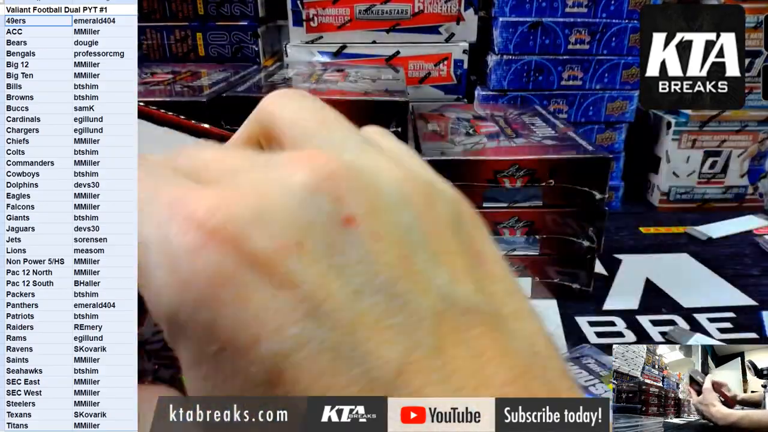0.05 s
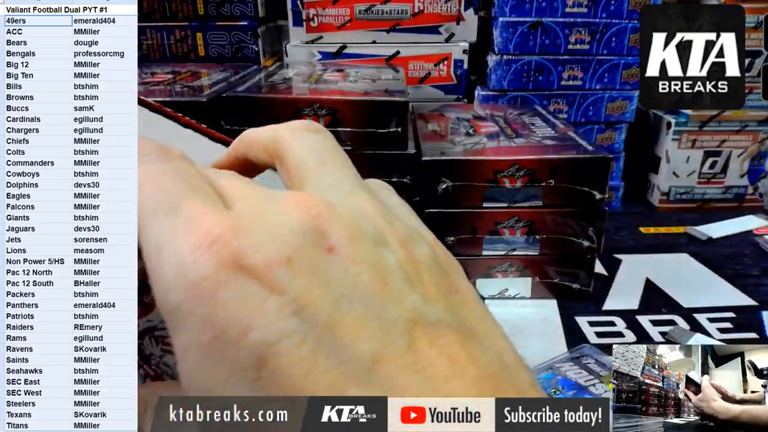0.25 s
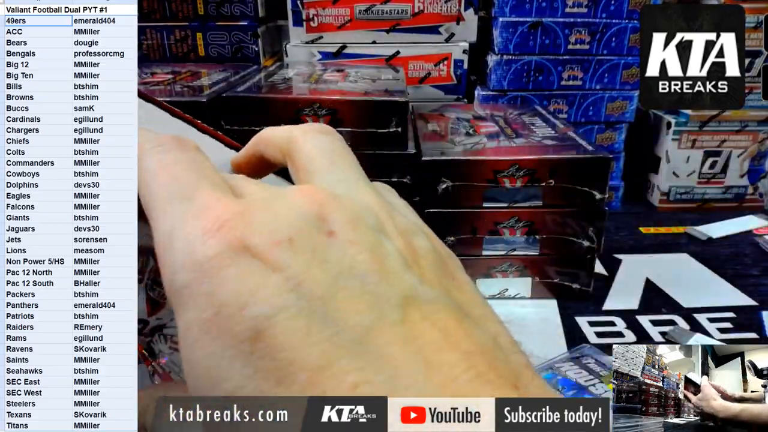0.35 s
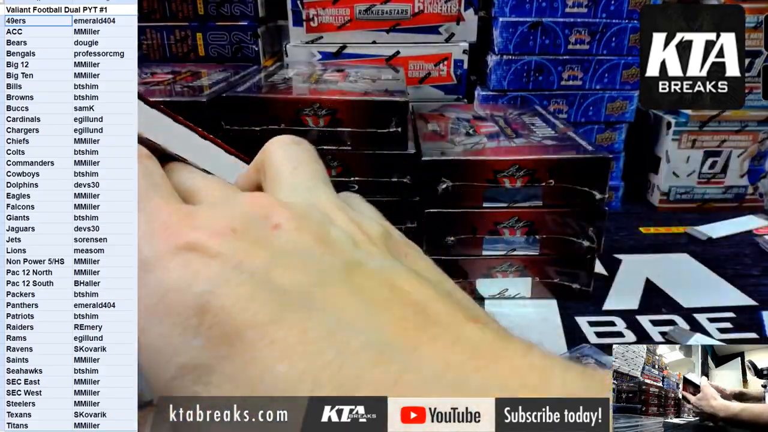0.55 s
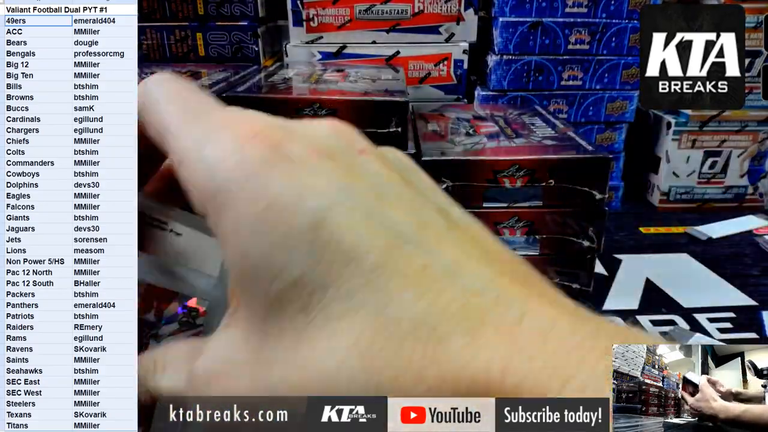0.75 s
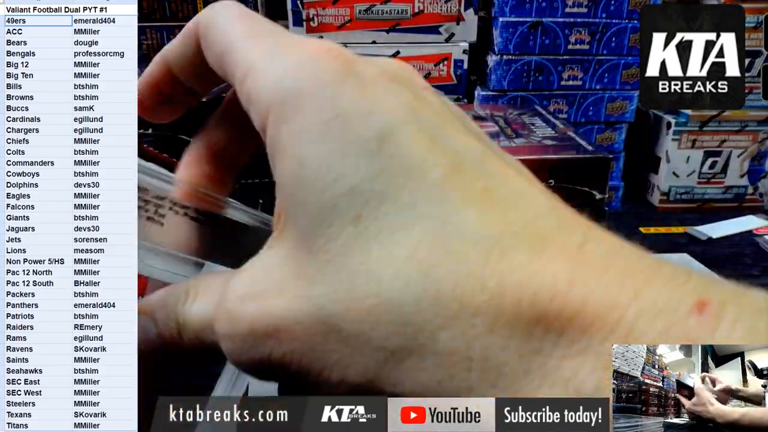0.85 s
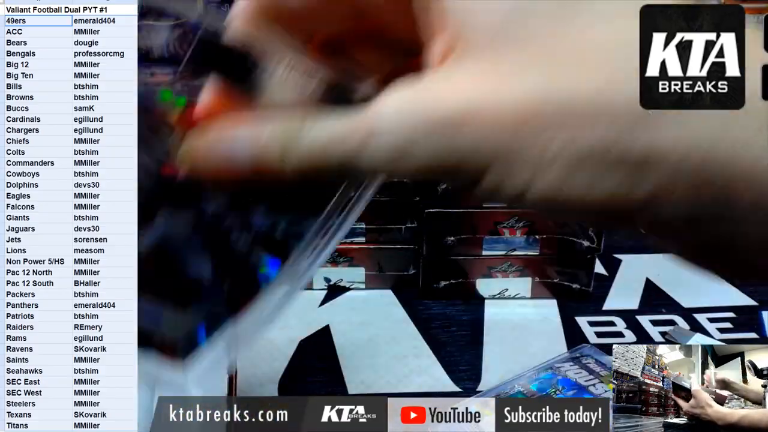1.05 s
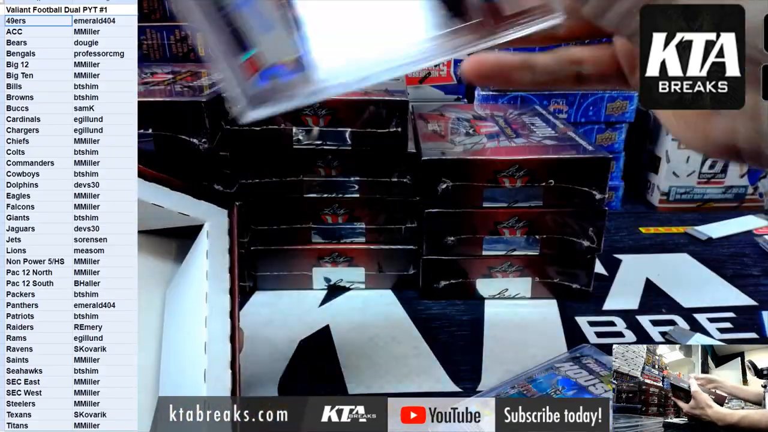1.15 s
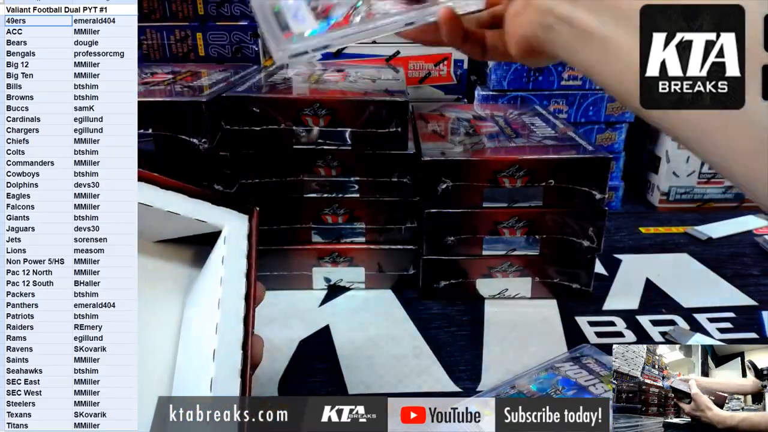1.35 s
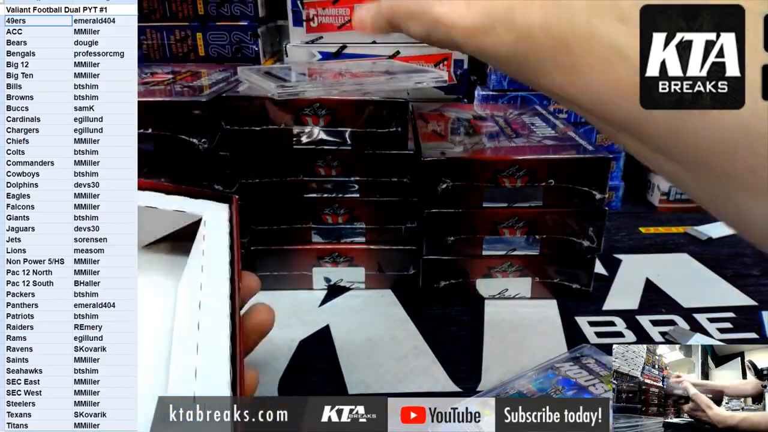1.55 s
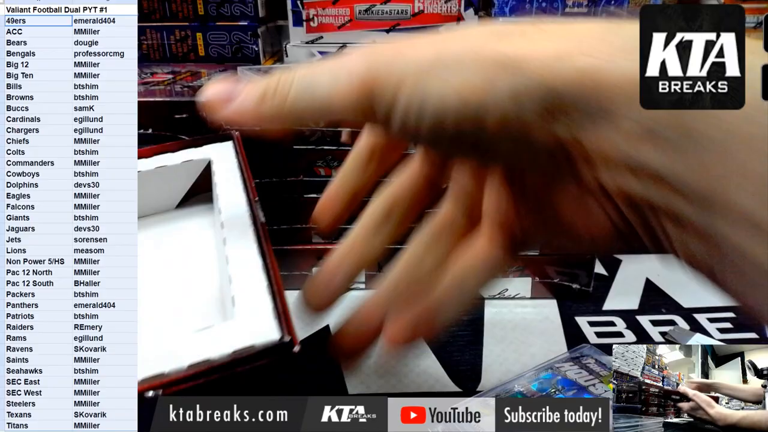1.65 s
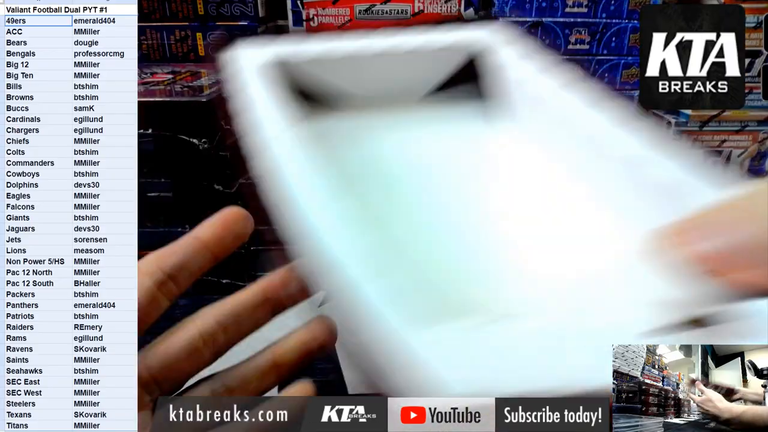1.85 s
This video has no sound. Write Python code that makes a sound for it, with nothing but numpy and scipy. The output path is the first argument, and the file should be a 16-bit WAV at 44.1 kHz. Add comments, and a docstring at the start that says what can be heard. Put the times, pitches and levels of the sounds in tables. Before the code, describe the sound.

Cardboard box bumps down with a deep boom, followed by taps, rubbing and a sharp plastic clack.

```python
"""Soft room noise and a faint slide come first, then a cardboard box of trading cards bumps down.
The table booms as a low mode and leaves the room's bass ringing; box and plastic case ring in damped modes.
Fingers tap the cardboard in short noise clicks and scrape it in strokes of jerky friction noise.
A plastic card case slides out, knocks on a stack of boxes and is pushed into place.
All is heard close to a microphone in a small room, with early echoes and a short reverb tail."""
import sys
import numpy as np
from scipy import signal
from scipy.fft import rfft, irfft, next_fast_len
from scipy.io import wavfile
from scipy.ndimage import map_coordinates

SR = 44100
rng = np.random.default_rng(int(sys.argv[2]) if len(sys.argv) > 2 else 0)


def int16_out(signal):
    """Quantize to a 16-bit WAV file."""
    q = np.round(np.clip(np.atleast_2d(signal).T, -1, 1) * 32767)
    wavfile.write(sys.argv[1], SR, q.astype(np.int16))


N = 83790  # length in samples


def amp(db):
    """Decibels to gain."""
    return 10 ** (np.asarray(db) / 20)


def unit(x):
    """Scale to rms 1."""
    return x / np.sqrt(np.mean(x ** 2) + 1e-20)


def along(points, hz):
    """Read (f/Hz, value) points on a log frequency axis."""
    f, v = np.transpose(points)
    return np.interp(np.log(hz + 1), np.log(f + 1), v)


def since(s):
    """Seconds since s, zero before it."""
    return np.maximum(np.arange(N) / SR - s, 0)


def filtered(x, response):
    """x times a response of frequency, padded so that its ringing does not wrap round."""
    m = next_fast_len(N + SR // 2)
    return irfft(rfft(x, m) * response(np.fft.rfftfreq(m, 1 / SR)), m)[:N]


def coloured(x, spectrum):
    """x shaped by a spectrum, at rms 1."""
    return unit(filtered(x, lambda hz: amp(along(spectrum, hz))))


def noise(spectrum):
    """Coloured noise of rms 1."""
    return coloured(rng.standard_normal(N), spectrum)


def wobble(rate):
    """A smooth random curve, rate knots a second."""
    knots = rng.standard_normal(2000)
    return map_coordinates(knots, [np.arange(N) * rate / SR], mode="wrap")


def resonance(x, centre_hz, q):
    """x through one band-pass resonance with unity gain at its centre."""
    def response(f):
        damping = 1j * f * centre_hz / q
        return damping / (centre_hz ** 2 - f * f + damping)
    return filtered(x, response)


def ring(s, db, modes, attack_s, rough):
    """Damped modes struck at s, their phases wandering by rough radians per unit of wobble."""
    t = since(s)
    partials = np.zeros(N)
    for hz, level, t60 in modes:
        phase = 2 * np.pi * hz * t + rough * wobble(hz / 8)
        partials += amp(level - 60 * t / t60) * np.sin(phase)
    return amp(db) * partials * (1 - np.exp(-t / attack_s))


# colour of the room noise: f/Hz, relative level/dB
FLOOR_COLOUR = [(20, -6.5), (40, 1.5), (72, -4.5), (100, -3.5), (170, -8.5), (240, -5), (320, -18.5),
                (650, -15.5), (1000, -26), (2000, -33.5), (4000, -43.5), (9000, -46.5), (16000, -49.5)]


def room_noise():
    """Steady coloured noise underneath everything."""
    return amp(-44.5) * noise(FLOOR_COLOUR)


# decay of the room's tail: f/Hz, t60/s
ROOM_DECAY = [(100, 0.26), (1000, 0.21), (5000, 0.17), (15000, 0.11)]


def room_tail(x):
    """The short answer of a furnished room: decaying noise whose treble dies sooner than its bass."""
    hz, t, grains = signal.stft(rng.standard_normal(SR // 2), SR, nperseg=256)
    fade = amp(-60 * t / along(ROOM_DECAY, hz)[:, None])
    tail = signal.istft(grains * fade, SR, nperseg=256)[1]
    late = np.pad(x, (200, 0))  # pre-delay in samples
    wet = signal.fftconvolve(late, tail / np.linalg.norm(tail))
    return amp(-11.5) * wet[:N]


def nearby(x):
    """Weak early echoes from the table top and the stacked boxes comb the sound."""
    delays = rng.uniform(0.001005, 0.011, size=7)  # s
    echo_db = -18.5  # each
    echoes = filtered(x, lambda hz: sum(np.exp(-2j * np.pi * hz * d) for d in delays))
    return x + amp(echo_db) * echoes


# how the rumble rises and falls: t/s, level/dB
RUMBLE_LEVEL = [(0, -58), (.2, -51), (.45, -34), (.75, -40), (1.1, -47), (1.3, -46), (1.6, -48), (1.9, -55)]
# colour of the rumble: f/Hz, relative level/dB
RUMBLE_COLOUR = [(20, -4.5), (55, -14.5), (70, 2.5), (86, 4.5), (100, -12.5), (160, -19.5), (400, -35),
                 (2000, -91)]


def hand_rumble():
    """Low noise from hands and arms on the table."""
    level_db = np.interp(np.arange(N) / SR, *np.transpose(RUMBLE_LEVEL))
    return amp(level_db) * noise(RUMBLE_COLOUR)


# box landing on the table: t/s, level/dB
LANDING = (.2733, -22.5)
# bass resonances of the room left ringing by the boom: f/Hz, level/dB, t60/s
ROOM_BASS = [(69.7, -25.5, 0.98), (83.16, -23, 0.95), (116.67, -18.5, 0.56), (154.3, -25, 0.46),
             (220, -22, 0.22), (276.7, -28.5, 0.3)]


def room_bass():
    """The room's low resonances swell at the landing and ring on."""
    return ring(LANDING[0], 0, ROOM_BASS, attack_s=0.017, rough=0.088)


# low booms of the table: t/s, level/dB, f/Hz, swell/s, hold/s
BOOMS = [(.2115, -16.5, 119.1, 0.0099, 0.051), (0.2751, -6.5, 115.4, 0.0019, 0.044),
         (0.394, -34, 114.7, 0.014, 0.043)]


def table_booms():
    """Each bump swells, holds and dies in one low mode with a faint octave."""
    overtone_db, t60 = -21, 0.13  # dB, s
    out = np.zeros(N)
    for s, db, hz, swell, hold in BOOMS:
        t = since(s)
        level = amp(db - 60 * since(s + hold) / t60) * (1 - np.exp(-(t / swell) ** 1.7))
        octave = np.sin(2 * np.pi * 2 * hz * t)
        out += level * (np.sin(2 * np.pi * hz * t) + amp(overtone_db) * octave)
    return out


# modes of the box: f/Hz, level/dB re landing, t60/s
BOX_MODES = [(307, 0, 0.081), (365, -2, 0.081), (534, 1.5, .06), (673, -6, 0.21), (791, -0.5, .07),
             (922, -5.5, 0.093), (1138, -15, .12), (1230, -4, 0.033), (1405, -23, .12)]


def box_landing():
    """The cardboard box rings in rough, quickly damped modes as it lands."""
    return ring(*LANDING, BOX_MODES, attack_s=0.0011, rough=0.6)


# hollow nudges of the box wall: t/s, level/dB, lowest mode f/Hz
NUDGES = [(0.577, -22, 252), (1.318, -32, 210), (1.4229, -31.5, 245)]
# modes of the wall: ratio to the lowest, level/dB re nudge, t60/s
WALL_MODES = [(1, -0.5, 0.049), (1.15, -6, 0.025), (2.38, -18.5, 0.16), (3.85, -25, 0.055),
              (5.12, -19.5, 0.097)]


def wall_nudges():
    """Each nudge rings the box wall, its modes all scaled from the lowest."""
    out = np.zeros(N)
    for s, db, lowest_hz in NUDGES:
        modes = [(ratio * lowest_hz, level, t60) for ratio, level, t60 in WALL_MODES]
        out += ring(s, db, modes, attack_s=0.0011, rough=0.19)
    return out


# plastic case knocking on the stack: t/s, level/dB
KNOCK = (1.3159, -29.5)
# modes of the case: f/Hz, level/dB re knock, t60/s
CASE_MODES = [(521, -6, 0.051), (891, -7, 0.098), (974, -8.5, 0.091), (1307, -8.5, 0.17), (1905, -1, 0.042),
              (2067, 4, 0.02), (2365, 4.5, 0.029), (2627, -2.5, 0.024), (2891, -17, .06),
              (3430, -27, 0.055)]


def case_knock():
    """The hard plastic case speaks faster than cardboard when it hits the stack."""
    return ring(*KNOCK, CASE_MODES, attack_s=0.00032, rough=0.63)


# taps on cardboard and plastic, ahead of the trim in scene():
# t/s, click level/dB, treble level/dB re click, t60/s, resonance of the spot f/Hz, its gain level/dB
TAPS = [(0.2104, -40, -22, 0.045, 1150, 11.5), (0.2739, -28, -7.5, 0.04, 2420, -2.5),
        (.555, -40, -9, 0.1, 1040, 9.5), (0.575, -27.5, -2, 0.041, 1440, 4.5),
        (0.73, -38.5, -4, 0.054, 3100, 10), (1.0279, -40.5, 4.5, 0.067, 1790, 9),
        (1.3165, -27, -9.5, 0.036, 2240, 6.5), (1.4822, -44.5, -5, 0.028, 866, 14),
        (1.5341, -42.5, -1, 0.028, 3900, 23)]
# colour of the click's body: f/Hz, relative level/dB
CLICK_COLOUR = [(150, 11), (500, 1.5), (1300, 3.5), (2000, 0.5), (3000, -7), (4500, -14.5), (8000, -39),
                (16000, -56)]
# colour of the click's treble: f/Hz, relative level/dB
CLICK_TREBLE = [(500, -55.5), (2500, 6.5), (4000, 0), (6300, 0.5), (9000, -3), (12000, -12), (16000, -22)]


def taps():
    """Every contact gives a short dry click, coloured by the spot it hits; the treble dies first."""
    out, body, treble = np.zeros(N), noise(CLICK_COLOUR), noise(CLICK_TREBLE)
    for s, db, treble_db, t60, hz, ring_db in TAPS:
        t = since(s)
        fade_db = -60 * t / t60
        attack = amp(db) * (1 - np.exp(-t / 0.00076))
        click = attack * amp(fade_db) * body
        bright = attack * amp(treble_db + 1.16 * fade_db) * treble
        out += click + amp(ring_db) * resonance(click, hz, q=4.13) + bright
    return out


def friction(spectrum):
    """Steady hiss plus tiny slips at random moments."""
    slips_per_s, slip_db = 700, -5.5  # slip level re hiss
    slips = unit((rng.random(N) < slips_per_s / SR) * rng.standard_normal(N))
    return coloured(rng.standard_normal(N) + amp(slip_db) * slips, spectrum)


# sliding strokes, ahead of the trim in scene():
# peak t/s, rise t/s, fall t/s, level/dB, treble level/dB re level, rubbed part f/Hz, its gain level/dB
STROKES = [(0.057, 0.14, 0.039, -63, 4, 9900, 0), (.165, 0.026, 0.034, -56.5, -1.5, 2000, -11),
           (0.229, 0.023, 0.089, -58.5, 6, 14000, 9.5), (.325, .03, 0.12, -59, -4, 1304, -4.5),
           (0.594, .03, 0.028, -52, -1, 1310, -5.5), (.655, 0.032, 0.081, -60.5, -3, 1410, 5),
           (0.736, 0.097, 0.1, -55.5, -13, 2880, -4), (0.878, 0.056, .1, -55, -2, 2000, 2),
           (1.03, 0.088, 0.065, -48.5, -2.5, 1630, 5.5), (1.112, 0.031, 0.038, -46.5, -7, 3330, -3),
           (1.17, 0.086, 0.031, -40, -6, 1230, -5), (1.225, 0.057, 0.09, -50, -3, 1280, 3),
           (1.296, 0.11, 0.098, -42, -3, 1270, 4), (1.372, 0.02, 0.019, -53.5, 3, 2160, 2),
           (1.482, 0.029, 0.042, -47.5, -3, 2040, 3.5), (1.526, 0.035, 0.047, -48.5, -2.5, 3520, 6),
           (1.685, 0.072, .08, -78, 8, 9900, 11)]
# colour of the rub's body: f/Hz, relative level/dB
RUB_COLOUR = [(200, -39.5), (700, -3), (1000, -6), (1400, 1.5), (2200, -5), (3200, -5.5), (5000, -14),
              (9000, -42.5), (16000, -50)]
# colour of the rub's treble: f/Hz, relative level/dB
RUB_TREBLE = [(500, -18), (2500, 4), (4000, -0.5), (6000, 1.5), (8000, 2.5), (11000, -6.5), (14000, -9),
              (16000, -17.5)]


def slides():
    """Friction swells jerkily with each stroke and rings the part that is rubbed."""
    range_db, jerk_db = 21.5, 2.5  # span of rise and fall; depth of the jerks
    t, out = np.arange(N) / SR, np.zeros(N)
    for s, rise, fall, db, treble_db, hz, ring_db in STROKES:
        from_peak = np.maximum((s - t) / rise, (t - s) / fall)  # 1 at the end of rise or fall
        level = amp(db - range_db * from_peak ** 1.204 + jerk_db * wobble(130))
        rub = level * (friction(RUB_COLOUR) + amp(treble_db) * friction(RUB_TREBLE))
        out += rub + amp(ring_db) * resonance(rub, hz, q=5.4)
    return out


def scene():
    """Room noise, the table's low end, and the handling with its echoes and tail."""
    low_end = hand_rumble() + room_bass() + table_booms()
    knocks = box_landing() + wall_nudges() + case_knock()
    handling = knocks + amp(-1) * nearby(taps() + slides())  # taps and slides trimmed by 1 dB
    return (room_noise() + low_end + handling + room_tail(handling))[None]


def record(dry):
    """Nothing is kept above the band limit."""
    top_hz = 16050
    return np.array([filtered(channel, lambda hz: hz < top_hz) for channel in dry])


dry = scene()
out = record(dry)
int16_out(out)
```